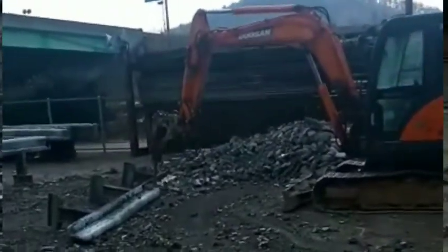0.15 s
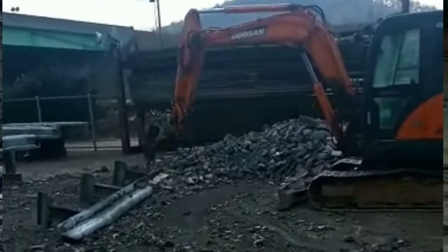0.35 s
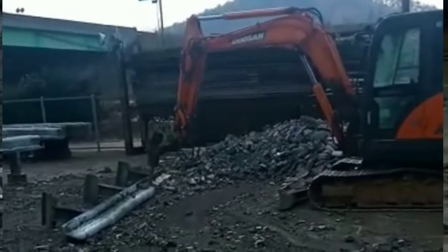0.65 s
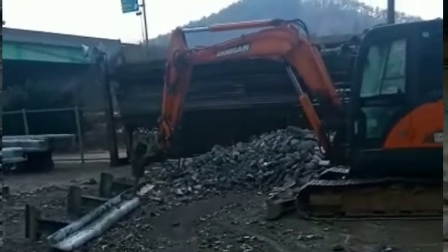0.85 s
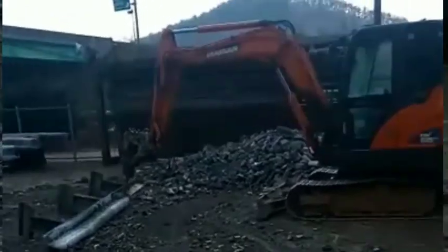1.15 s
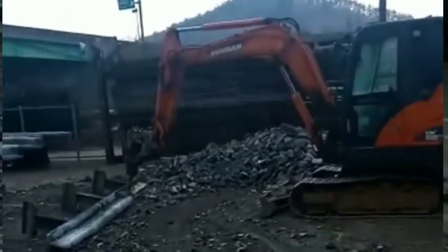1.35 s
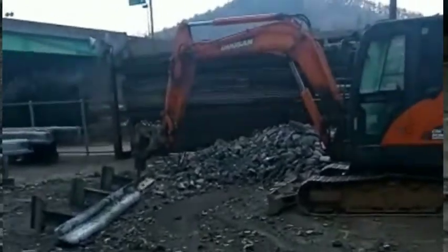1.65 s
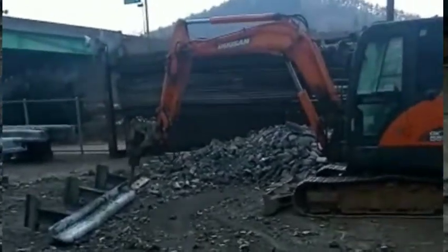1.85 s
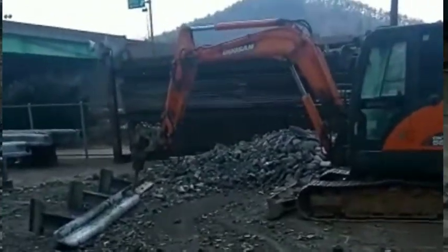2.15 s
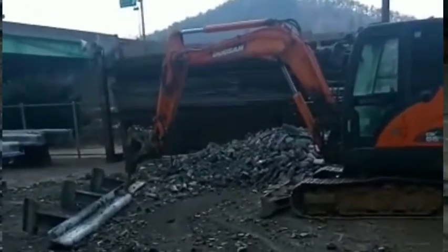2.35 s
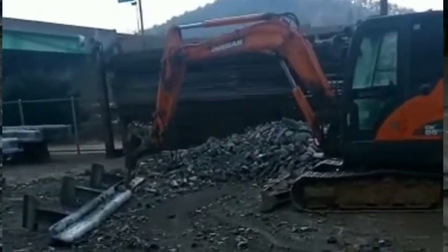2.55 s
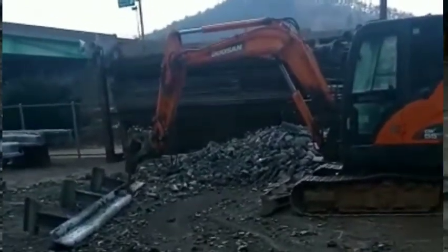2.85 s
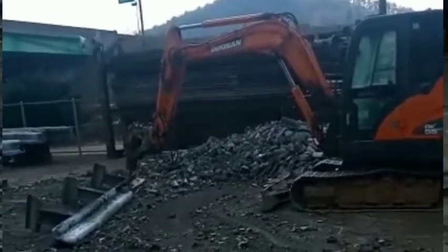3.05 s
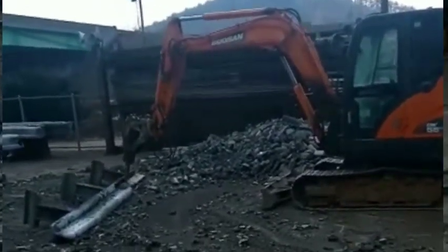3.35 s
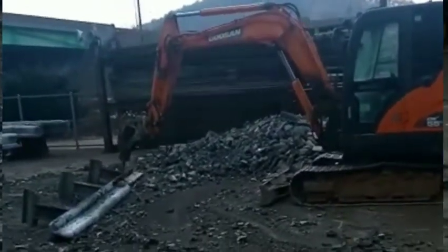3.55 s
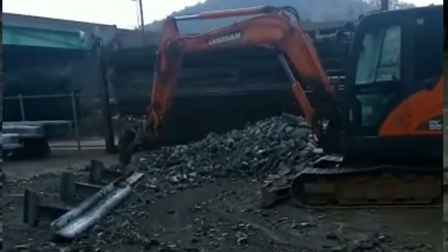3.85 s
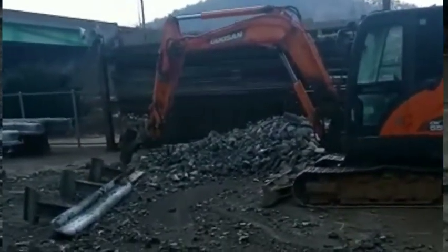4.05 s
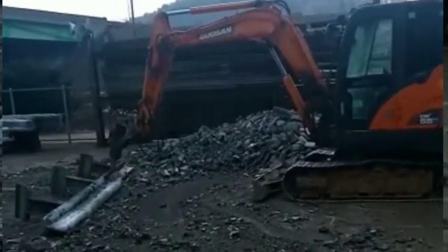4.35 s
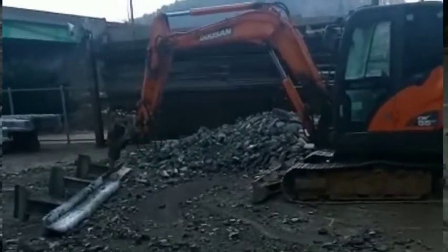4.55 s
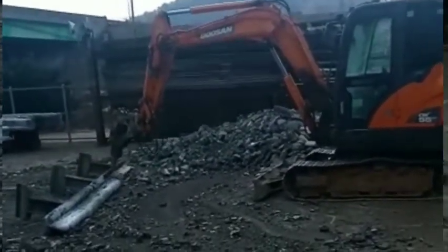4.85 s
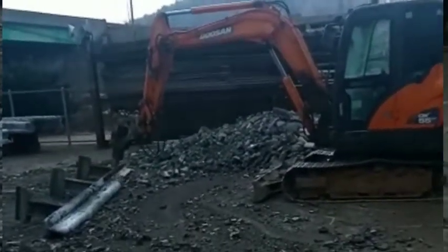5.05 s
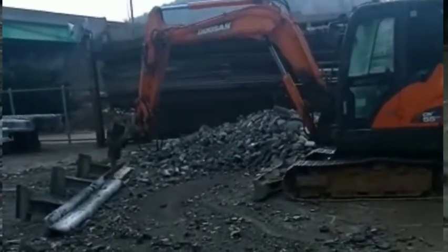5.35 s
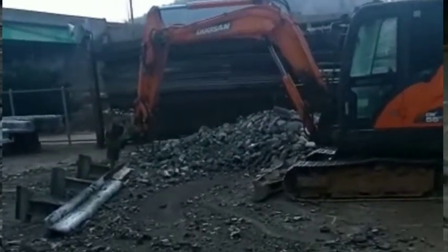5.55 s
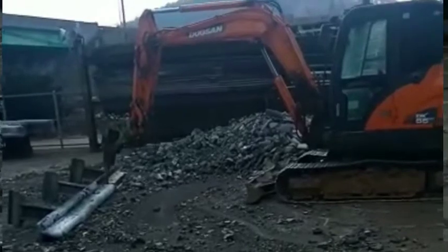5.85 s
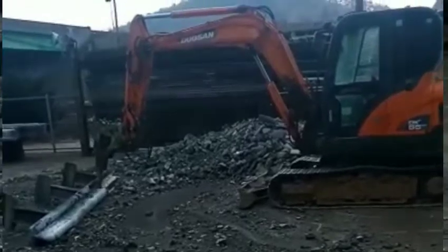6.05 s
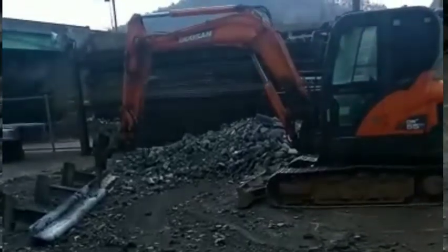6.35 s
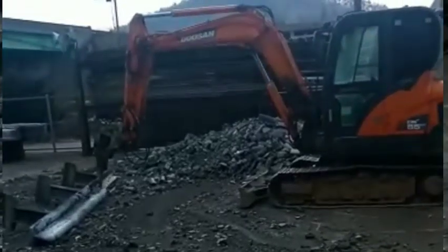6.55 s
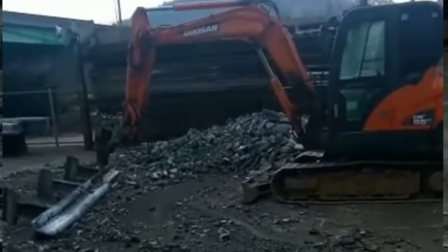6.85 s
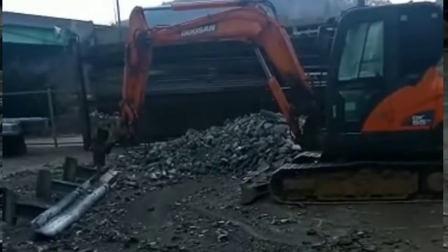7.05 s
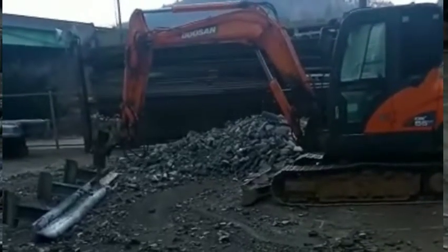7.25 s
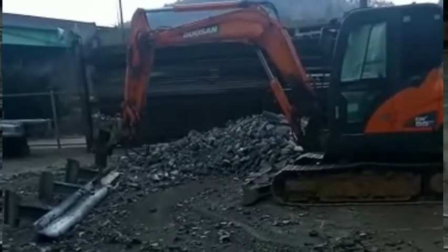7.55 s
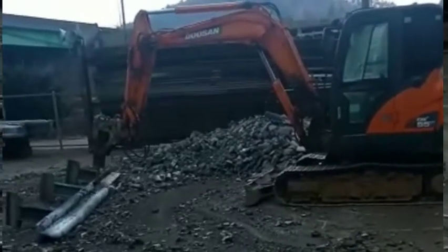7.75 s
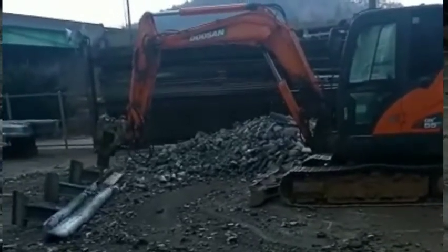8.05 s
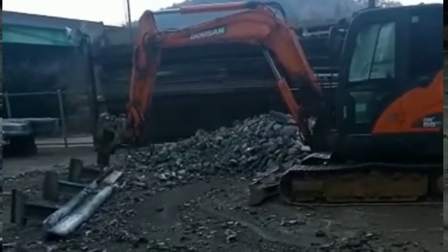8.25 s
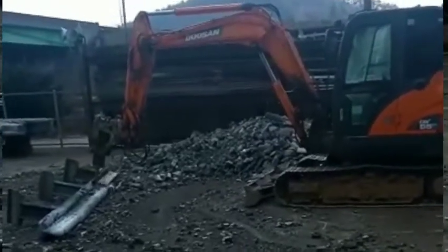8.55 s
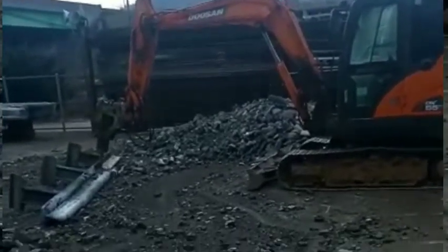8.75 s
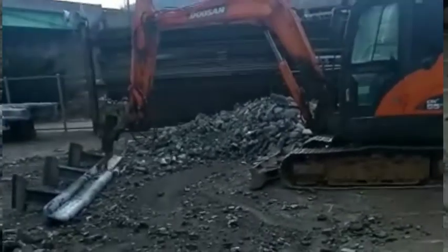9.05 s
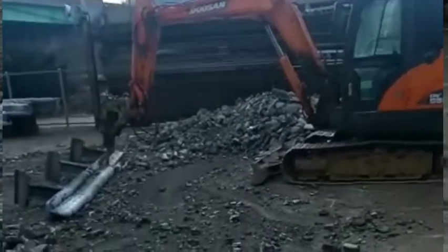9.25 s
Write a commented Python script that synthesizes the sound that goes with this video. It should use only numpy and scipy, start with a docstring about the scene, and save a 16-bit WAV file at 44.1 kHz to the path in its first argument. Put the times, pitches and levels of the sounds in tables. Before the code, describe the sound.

An excavator's hydraulic breaker hammers crusted steel rails in six short metallic bursts over a droning diesel engine in an open yard.

```python
"""A diesel engine drones throughout, with a faint whine; tool knocks lead up to the early bursts.
Six short bursts of a hydraulic breaker follow, each on a new spot of crusted steel rail in a yard.
Per blow: valve spurt, crack and rebounds, coloured noise for shaken machine and rails, ringing modes, yard echo.
Pushes of the arm load the engine and raise its exhaust and pump rumble; oil draw sags its speed."""
import sys
import numpy as np
from scipy import signal
from scipy.fft import rfft, irfft, next_fast_len
from scipy.io import wavfile
from scipy.ndimage import uniform_filter1d

SR = 44100
rng = np.random.default_rng(int(sys.argv[2]) if len(sys.argv) > 2 else 0)


def output_pcm(signal):
    """Save a mono or channel-first signal as 16-bit PCM at the path in sys.argv[1].

    Samples are clipped to [-1, 1] before scaling.
    """
    pcm = np.clip(np.atleast_2d(signal).T, -1, 1) * 32767
    wavfile.write(sys.argv[1], SR, np.round(pcm).astype(np.int16))


N = 414099

# piston blows: time_s, strength_db, looseness (0 chisel seated firmly, 1 skating on the crust), ring_db
BLOWS = [(.887, -10, 0.68, -3), (1.026, -12, 0.62, -4.5), (1.132, -13.5, 0.36, -3.5),
         (1.24, -13, 0.51, -1.5), (1.349, -15, 0.29, -11), (2.399, -11.5, 0.6, -5.5),
         (2.517, -12.5, .55, -4), (2.626, -9.5, 0.66, -6), (2.733, -13, 0.45, -2), (2.84, -12.5, 0.3, -8),
         (2.947, -10, 0.68, -7.5), (4.031, -12, 0.45, -2.5), (4.167, -11, 0.52, -6.5),
         (4.297, -12, 0.34, -5), (4.427, -13, 0.27, -5.5), (4.555, -12, 0.3, -2.5), (4.67, -14, 0.18, -2.5),
         (5.905, -10, .65, 1.5), (6.012, -11.5, 0.51, -5.5), (6.12, -13, 0.18, -12), (6.236, -11, 0.65, -6),
         (6.405, -10, 0.81, -7.5), (6.549, -11.5, 0.77, 1.5), (6.664, -13.5, 0.38, -2.5),
         (6.779, -11, 0.46, -3.5), (6.919, -11, 0.61, -6), (7.061, -9, 0.83, -6.5), (7.704, -9, 0.99, -2),
         (7.866, -13, 0.66, 3.5), (7.976, -15, .15, -4.5), (8.085, -13, 0.11, -8.5),
         (8.192, -14.5, 0.1, -9), (8.303, -12.5, 0.2, -11), (8.407, -12, 0.21, -8.5),
         (8.517, -13, 0.065, -10), (8.92, -8, 0.91, -5.5), (9.094, -11, 0.55, -7), (9.198, -15, .05, -10.5),
         (9.308, -14.5, 0.2, -12)]
# knocks and scrapes of the tool: time_s, strength_db, contact (0 rubble, 1 steel on steel), ring_db
KNOCKS = [(.048, -40.5, 0.47, 14), (.603, -38, 0.89, 9), (.62, -29, 0.51, -5), (.649, -29, 0.83, -9),
          (.96, -33, 1, 10), (2.205, -44, 0.64, 4), (2.307, -31, 1, 15), (2.322, -23, 0.86, 6),
          (3.376, -42, 0.51, 14.5), (3.812, -41.5, .05, -14), (3.968, -38, 0.35, 7.5),
          (3.997, -33, 0.75, -1), (5.315, -49.5, 1, 2), (5.331, -43.5, 1, 11), (5.388, -37, 0.16, -6),
          (5.472, -39.5, 0.2, -8), (5.804, -26.5, 0.54, 6)]
# blow voices, row firm then row loose: gain_db, thud_db, clatter_db, decay_factor
BLOW_VOICE = [(2, -8.5, -0.5, 0.9), (-9, 6.5, 6.5, 0.86)]
# knock voices, row rubble then row steel: gain_db, thud_db, clatter_db, decay_factor
KNOCK_VOICE = [(-1.5, 5.5, -0.5, 1), (-6, 1, 18, 0.36)]
# spots under the chisel: start_s, resonances of rail and crust [(pitch_hz, level_db)]
SPOTS = [(0, [(215, 2), (339, 2), (463, 5), (581, 6), (775, 5), (964, 6), (1200, 0), (1330, 4)]),
         (2, [(183, 3), (420, 7), (484, 4), (635, 7), (759, 2), (958, 5), (1184, 5), (1340, 4)]),
         (3.6, [(151, 1), (415, 6), (576, 2), (727, 7), (931, 6), (1050, 5), (1238, 5), (1346, 2)]),
         (5.2, [(436, 4), (598, 2), (754, 3), (872, 2), (974, 5), (1120, 1), (1244, 3), (1351, 2)]),
         (7.5, [(151, 5), (264, 8), (409, 5), (619, 1), (727, 4), (980, 5), (1071, 5), (1184, 2)]),
         (8.8, [(388, 3), (458, 2), (619, 4), (759, 3), (840, 3), (931, 7), (1093, 4), (1314, 3)])]
# longest-singing mode, a row per spot: pitch_hz, level_db
SINGING = [(4000, -31), (3570, -46), (3840, -26.5), (3630, -28), (4480, -29.5), (3320, -32)]
# colour of shaken housing, arm and ground: freq_hz, level_db (per Hz)
BODY = [(35, -39.5), (55, -34), (80, -1), (150, -4), (400, 2.5), (520, -2), (800, 4.5), (1020, 1),
        (1250, -7), (1500, -9), (2200, -8), (4300, -16.5), (5000, -25), (7000, -35.5), (9200, -71.5),
        (15000, -60)]
# growth and decay of the shaking: freq_hz, rise_s, t60_s (before decay_factor), yard_db, yard_t60_s
SHAKE = [(90, 0.0079, 0.99, -16, 0.49), (340, 0.027, 0.38, -9.5, 1), (900, 0.0012, 0.21, -17, 1),
         (1900, 0.0062, 0.32, -10.5, 0.87), (4470, 0.0027, 0.25, -11, 0.66),
         (12000, 0.0015, 0.59, -9, 0.36)]
# likeness of blows on one spot: freq_hz, correlation
REPEAT = [(80, .6), (300, .86), (1000, .86), (2500, .6), (6000, .3)]
# steel modes of chisel and housing: pitch_hz, level_db
STEEL = [(1541, -21.5), (2270, -0.5), (2774, -9), (3250, -22.5), (3645, -2.5), (3685, -1), (3875, -1),
         (4375, -4.5), (5405, -29), (5720, -13), (5900, -13.5), (7890, -29), (8140, -39), (8400, -33.5),
         (10140, -45.5), (10280, -42), (12380, -51), (12650, -45), (14700, -47), (14950, -41.5)]
# left-right likeness of the hammering: freq_hz, correlation
HAMMER_SAME = [(90, 1), (170, .98), (260, .8), (500, .9), (1000, .56), (2000, .74), (4000, .46),
               (12000, .4)]
# left-right likeness of the engine noise: freq_hz, correlation
ENGINE_SAME = [(75, 1), (170, .97), (290, .76), (640, .55), (1400, 0), (7000, 0)]
# stereo lean, left minus right: freq_hz, lean_db
LEAN = [(80, 0), (250, .8), (500, -1.1), (1000, 1.8), (2000, -1), (4000, -2), (8000, -.8), (12000, 2.5)]
# pushes of the tool against the ground: start_s, length_s, load_db
PUSHES = [(0.312, 0.6, 14), (1.7, 0.96, 5.5), (3.3, .28, 2.5), (5.15, 0.69, 10.5), (6.4, 0.68, 5.5),
          (8.82, 0.58, 9.5)]
# exhaust orders: multiple of crank speed, level_db
ORDERS = [(2, -2), (3, -5.5), (4, 0), (6, -10), (7, -31), (8, -21)]
# mechanical noise of engine and fan: freq_hz, level_db (per Hz)
DRONE = [(22, -33.5), (40, -13), (70, -8), (130, -2), (185, 0.5), (300, -5), (480, -10.5), (800, -10),
         (1150, -14.5), (2000, -13.5), (3200, -23), (6800, -43.5), (9000, -57.5), (15500, -60.5)]

SIZE = 2 ** 15  # samples per event
BINS_HZ, TIME_S = np.fft.rfftfreq(SIZE, 1 / SR), np.arange(SIZE) / SR
SPOT_WIDTH_HZ = 34.7
# a mode is as wide as the larger of the minimum width and pitch / Q
MODE_MIN_WIDTH_HZ, MODE_MAX_Q = 34, 130
MODE_SPREAD_DB, MODE_DRIFT_SHARE = 3, .0015  # rms per strike
LOAD_RISE_S, LOAD_RELEASE_S = .32, .07  # time constants
FIRINGS_HZ, HUNT_RMS_HZ, SAG_HZ = 55.37, .3, 1.3
STROKE_S, OIL_LAG_S = 0.1056, 0.1  # oil flows for one stroke before each blow; engine feels it late
EXHAUST_UNLOADED_DB = -45
PUMP_REST_DB, PUMP_DB_PER_LOAD_DB, PUMP_HAMMER_DB = -1.5, 0.45, 2.5
BAND_EDGE_HZ = 15600


def amp(db):
    """Decibels to gain."""
    return 10 ** (np.asarray(db) / 20)


def unit(x):
    """Scales to rms 1."""
    return x / np.sqrt(np.mean(x ** 2) + 1e-20)


def read(points, hz, column=1):
    """Interpolates one table column over log frequency."""
    table = np.transpose(points)
    return np.interp(np.log(hz + 1), np.log(table[0] + 1), table[column])


def add(mix, time_s, sound):
    """Mixes in a stereo sound at time_s."""
    part = mix[:, max(round(time_s * SR), 0):][:, :sound.shape[1]]
    part += sound[:, :part.shape[1]]


def causal(db):
    """Minimum-phase response with these gains: rings only after its cause."""
    cepstrum = irfft(np.log(amp(db)))
    cepstrum[1:SIZE // 2] *= 2
    cepstrum[SIZE // 2 + 1:] = 0
    return np.exp(rfft(cepstrum))


def pair(spectra, same):
    """Turns two unrelated spectra into left and right with the given correlation."""
    same = np.clip(same, -1, 1)
    mid = spectra[0] * np.sqrt((1 + same) / 2)
    side = spectra[1] * np.sqrt((1 - same) / 2)
    return np.array([mid + side, mid - side])


def wander(smooth_samples):
    """Slow random drift of rms 1: noise smoothed twice."""
    once = uniform_filter1d(rng.standard_normal(N), smooth_samples)
    return unit(uniform_filter1d(once, smooth_samples))


def hammering(patterns):
    """Piston blows: a looser chisel passes less into the rail and shakes the machine more."""
    return strikes(voiced(BLOWS, BLOW_VOICE), patterns, crack_db=-6, body_db=35.5, steel_db=-6,
                   rail_db=-9.0, dull_db_per_khz=0.0)


def clanking(patterns):
    """Tool knocks: soft contact hardly wakes the high steel modes."""
    return strikes(voiced(KNOCKS, KNOCK_VOICE), patterns, crack_db=-17.0, body_db=39.5, steel_db=-9.0,
                   rail_db=-24, dull_db_per_khz=-4.5)


def voiced(events, voice):
    """Blends two voice rows: time_s, force_db, thud_db, clatter_db, ring_db, decay_factor."""
    first, last = np.array(voice)
    rows = []
    for time_s, strength_db, blend, ring_db in events:
        mixed = first + (last - first) * np.clip(blend, 0, 1)
        gain_db, thud_db, clatter_db, decay_factor = mixed
        rows.append((time_s, strength_db + gain_db, thud_db, clatter_db, ring_db, decay_factor))
    return rows


def strikes(rows, patterns, crack_db, body_db, steel_db, rail_db, dull_db_per_khz,
            contact_hz=1700, lag_s=0.00014):
    """A short push, then shaking coloured by the spot under the chisel, plus ringing steel."""
    out = np.zeros((2, N))
    highpass = 1j * BINS_HZ / (1j * BINS_HZ + 300)
    push = amp(crack_db) / (1 + 1j * BINS_HZ / contact_hz) ** 2 * highpass
    bass = 1 / (1 + (BINS_HZ / 330) ** 4)
    treble = 1 - 1 / (1 + (BINS_HZ / 1300) ** 4)
    # tool stands a little to the right: left hears it later
    delays = np.array([np.exp(-2j * np.pi * BINS_HZ * lag_s), np.ones(len(BINS_HZ))])
    ports = delays * amp(read(LEAN, BINS_HZ) * np.array([[.5], [-.5]]))
    body_colour_db = read(BODY, BINS_HZ)
    colours_db = [
        body_colour_db + sum(db * np.exp(-((BINS_HZ - hz) / SPOT_WIDTH_HZ) ** 2) for hz, db in modes)
        for _, modes in SPOTS]
    rails = [peaks(modes, width_hz=3.4) for _, modes in SPOTS]
    fade = np.minimum(1, np.linspace(10, 0, SIZE)) ** 2
    for time_s, force_db, thud_db, clatter_db, ring_db, decay_factor in rows:
        spot = sum(time_s >= start_s for start_s, _ in SPOTS) - 1
        colour_rms = np.sqrt(np.mean(amp(colours_db[spot]) ** 2))
        colour = causal(colours_db[spot] + thud_db * bass + clatter_db * treble) / colour_rms
        shaking = pair(shake(patterns[spot], decay_factor), read(HAMMER_SAME, BINS_HZ))
        waves = shaking + push * (1 + rebounds())
        sound = amp(body_db) * irfft(waves * colour * ports)
        # the chisel never seats the same way twice: modes shift and trade strength
        modes = []
        for hz, db in STEEL:
            pitch_hz = hz * (1 + MODE_DRIFT_SHARE * rng.standard_normal())
            level_db = db + dull_db_per_khz * hz / 1000 + MODE_SPREAD_DB * rng.standard_normal()
            modes.append((pitch_hz, level_db))
        chisel = peaks(modes, np.maximum(MODE_MIN_WIDTH_HZ, BINS_HZ / MODE_MAX_Q))
        singing = peaks([SINGING[spot]], width_hz=12)
        sound += amp(steel_db + ring_db) * ring(chisel, t60_s=0.35, rise_s=0.0017)
        sound += amp(SINGING[spot][1] + ring_db) * ring(singing, t60_s=0.87, rise_s=0.0047)
        sound += amp(rail_db) * ring(rails[spot], t60_s=0.58, rise_s=0.0028)
        add(out, time_s, amp(force_db) * sound * fade)
    return out


def scatter():
    """Short-time spectra of a random pattern of reflections."""
    return signal.stft(rng.standard_normal((2, SIZE)), nperseg=256)[2]


def shake(pattern, decay_factor):
    """A strike spreads through machine and rails, dies away, and returns from the yard."""
    hz = np.fft.rfftfreq(256, 1 / SR)[:, None]
    t = np.arange(pattern.shape[2]) * 128 / SR
    rise_s = np.maximum(read(SHAKE, hz, column=1), 1e-4)
    t60_s = read(SHAKE, hz, column=2) * max(decay_factor, .2)
    near = (1 - np.exp(-(t + 0.0026) / rise_s)) * amp(-60 * t / t60_s)
    yard_db = read(SHAKE, hz, column=3) - 60 * t / read(SHAKE, hz, column=4)
    yard = (1 - np.exp(-t / 0.062)) * amp(yard_db)
    envelope = np.hypot(near, yard)
    envelope /= np.linalg.norm(envelope, axis=1, keepdims=True)
    # loose parts chatter: treble comes in clumps
    envelope *= amp(2.8 * rng.standard_normal(len(t)) * hz / (hz + 1200))
    same = read(REPEAT, hz)
    blended = same * pattern + np.sqrt(1 - same ** 2) * scatter()
    x = signal.istft(blended * envelope, nperseg=256)[1]
    return rfft(unit(x[:, :SIZE]) / np.sqrt(SIZE))


def rebounds(step_db=-3, delay_s=.0105, count=3):
    """The tool bounces on the rail, unevenly and ever more weakly."""
    times_s = np.cumsum(delay_s * np.exp(0.2056 * rng.standard_normal(count)))
    return sum(amp(step_db * (k + 1.5)) * np.exp(-2j * np.pi * BINS_HZ * s)
               for k, s in enumerate(times_s))


def peaks(modes, width_hz):
    """Spectrum of a set of narrow resonances."""
    return sum(amp(db) / (1 + (2 * (BINS_HZ - hz) / width_hz) ** 2) for hz, db in modes)


def ring(spectrum, t60_s, rise_s):
    """Ringing steel arrives along many paths: narrowband noise, so modes flutter as they die."""
    noise = rfft(rng.standard_normal((2, SIZE)))
    paths = pair(noise * spectrum, read(HAMMER_SAME, BINS_HZ))
    return unit(irfft(paths)) * (1 - np.exp(-TIME_S / rise_s)) * amp(-60 * TIME_S / t60_s)


def valve(level_db=-28.5, lead_s=0.016, decay_s=0.017, centre_hz=5000, width_hz=1400):
    """The control valve snaps over just before the piston lands: a decaying spurt of band noise."""
    out = np.zeros((2, N))
    band = causal(-np.minimum(9 * ((BINS_HZ - centre_hz) / width_hz) ** 2, 70))
    band_rms = np.sqrt(np.mean(abs(band) ** 2))
    for time_s, strength_db, *_ in BLOWS:
        spurt = rng.standard_normal((2, SIZE)) * np.exp(-TIME_S / decay_s)
        add(out, time_s - lead_s, amp(strength_db + level_db) * irfft(rfft(spurt) * band) / band_rms)
    return out


def engine_state():
    """Firing rate, load and pump rumble: pushes add load, oil draw sags the slowly hunting speed."""
    t = np.arange(N) / SR
    load_db = np.zeros(N)
    for start_s, length_s, push_db in PUSHES:
        rise = 1 - np.exp(-np.clip(t - start_s, 0, length_s) / LOAD_RISE_S)
        release = np.exp(-np.maximum(t - start_s - length_s, 0) / LOAD_RELEASE_S)
        load_db += push_db * rise * release
    flowing = np.any([(t > s - STROKE_S) & (t < s) for s, *_ in BLOWS], axis=0)
    keep = np.exp(-1 / (OIL_LAG_S * SR))
    draw = signal.lfilter([1 - keep], [1, -keep], flowing.astype(float))
    firings_hz = FIRINGS_HZ - SAG_HZ * draw + HUNT_RMS_HZ * wander(12000)
    strain_db = PUMP_REST_DB + PUMP_DB_PER_LOAD_DB * load_db + PUMP_HAMMER_DB * draw
    return firings_hz, load_db, strain_db


def exhaust(firings_hz, load_db):
    """Four cylinders fire twice a turn, harder under load; higher crank orders waver more."""
    turns = np.cumsum(firings_hz / 2) / SR
    out = np.zeros(N)
    for order, db in ORDERS:
        waver_rms_db = 1.4 * (3.5 - 1 / order)
        level = amp(db + waver_rms_db * wander(5000))
        out += level * np.sin(2 * np.pi * (round(order) * turns + rng.random()))
    return out * amp(EXHAUST_UNLOADED_DB + load_db)


def drone(firings_hz, strain_db, level_db=-36.5, pulse_depth=0.084, treble_share=0.51):
    """Engine and fan noise pulsing with the firings; pump strain swells the low part most."""
    size = next_fast_len(N)
    hz = np.fft.rfftfreq(size, 1 / SR)
    noise = rfft(rng.standard_normal((2, size)))
    spectrum = pair(noise, read(ENGINE_SAME, hz)) * amp(read(DRONE, hz))
    whole = irfft(spectrum, size)[:, :N]
    low = irfft(spectrum / (1 + (hz / 900) ** 2), size)[:, :N]
    firing = 1 + pulse_depth * np.cos(2 * np.pi * np.cumsum(firings_hz) / SR)
    strained = low * amp(strain_db) + (whole - low) * amp(treble_share * strain_db)
    return amp(level_db) / whole.std() * firing * strained


def whine(level_db=-53, centre_hz=550, width_hz=4):
    """Faint machine tone of steady pitch: narrowband noise, so its level flutters."""
    size = next_fast_len(N)
    line = 1 / (1 + ((np.fft.rfftfreq(size, 1 / SR) - centre_hz) / width_hz) ** 2)
    return amp(level_db) * unit(irfft(rfft(rng.standard_normal(size)) * line, size)[:N])


def scene():
    """Hammering and clanking over the running engine."""
    patterns = [scatter() for _ in SPOTS]
    breaker = hammering(patterns) + clanking(patterns) + valve()
    firings_hz, load_db, strain_db = engine_state()
    engine = exhaust(firings_hz, load_db) + drone(firings_hz, strain_db)
    return breaker + engine + whine()


def record(dry):
    """Rounds off the loudest peaks, then limits the band."""
    rounded = dry / (1 + (dry / .95) ** 6) ** (1 / 6)
    lowpass = signal.firwin(401, BAND_EDGE_HZ, window=("kaiser", 9), fs=SR)
    return signal.oaconvolve(rounded, lowpass[None], "same")


dry = scene()
out = record(dry)
output_pcm(out)
```